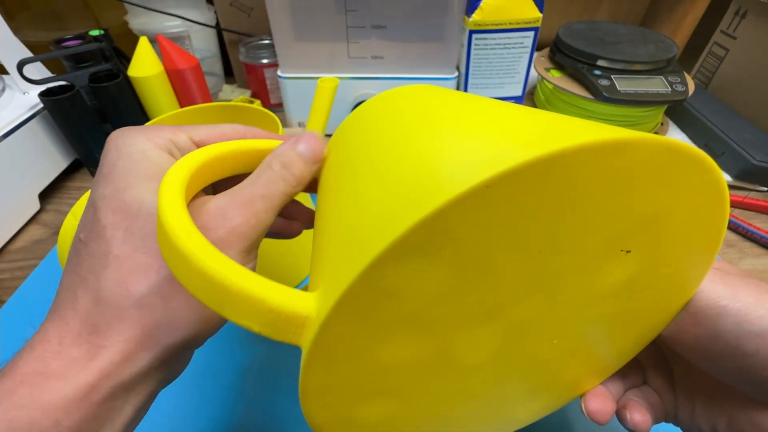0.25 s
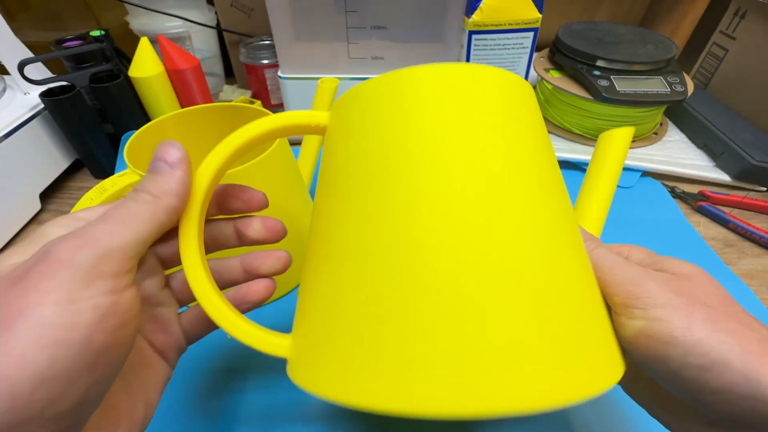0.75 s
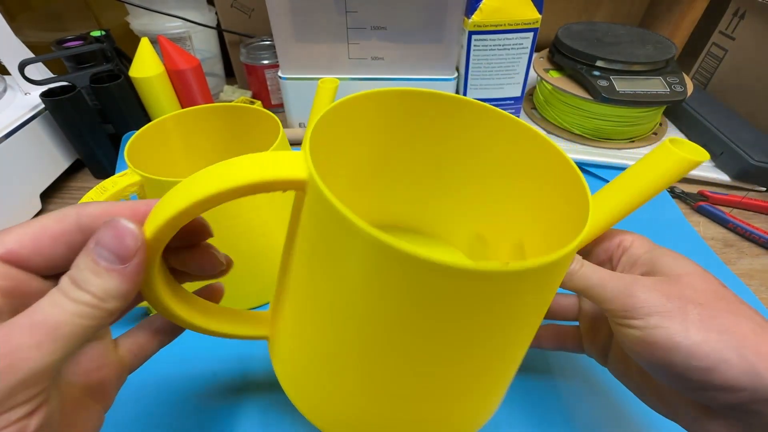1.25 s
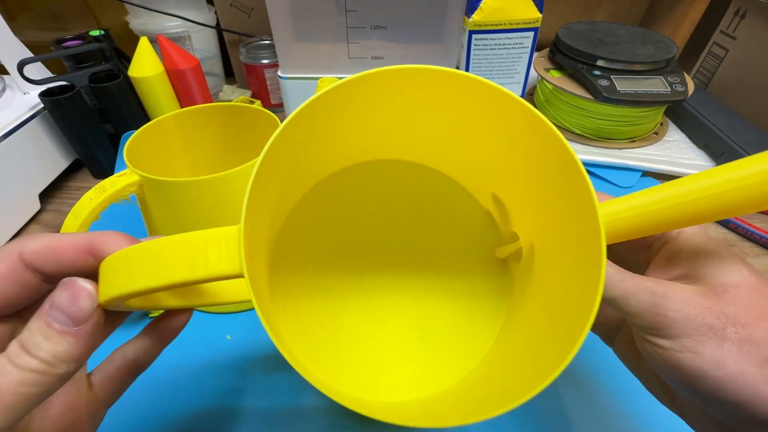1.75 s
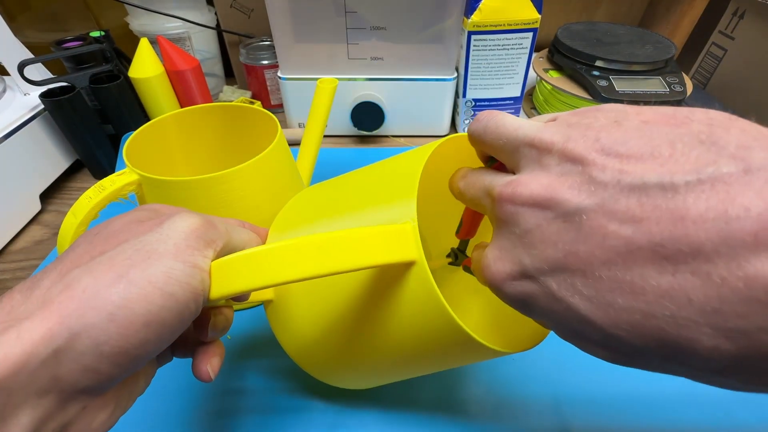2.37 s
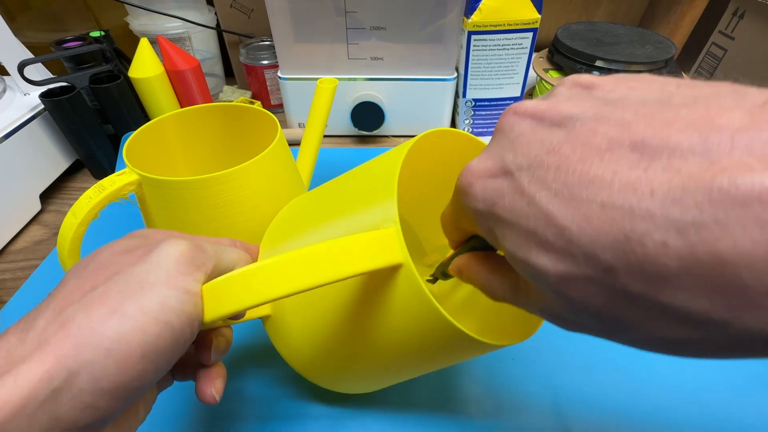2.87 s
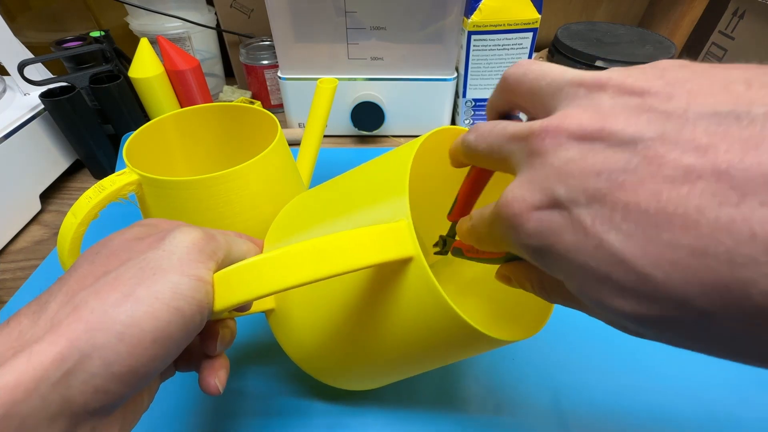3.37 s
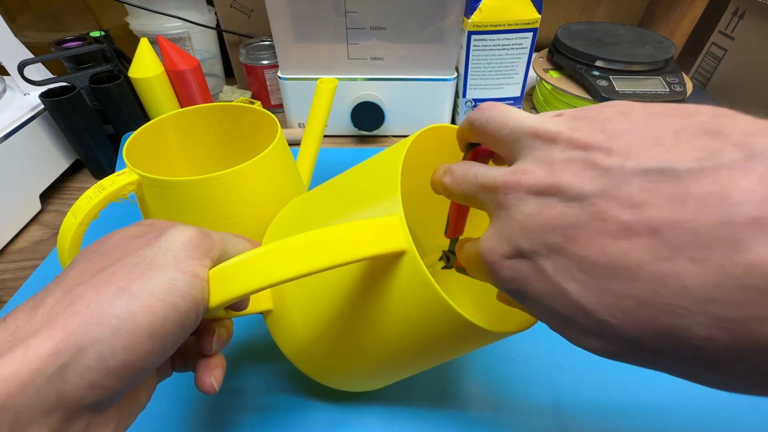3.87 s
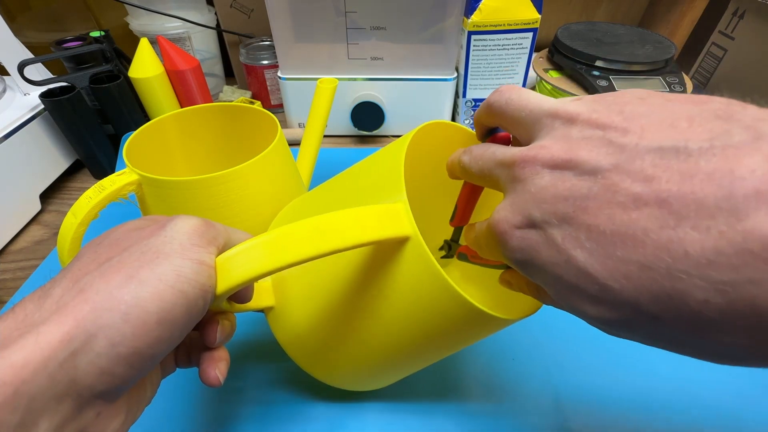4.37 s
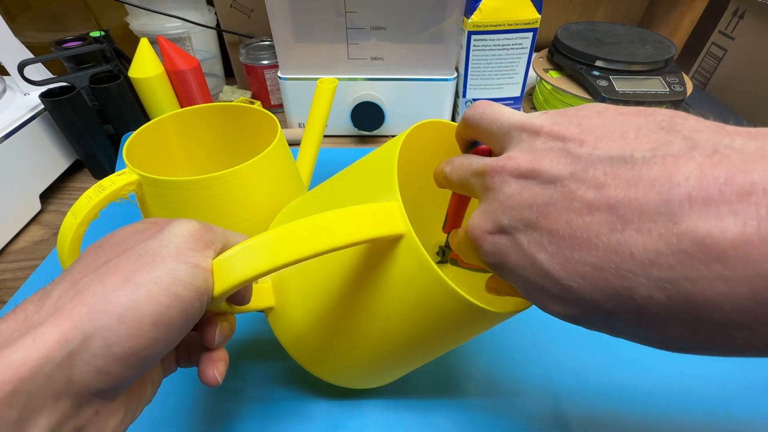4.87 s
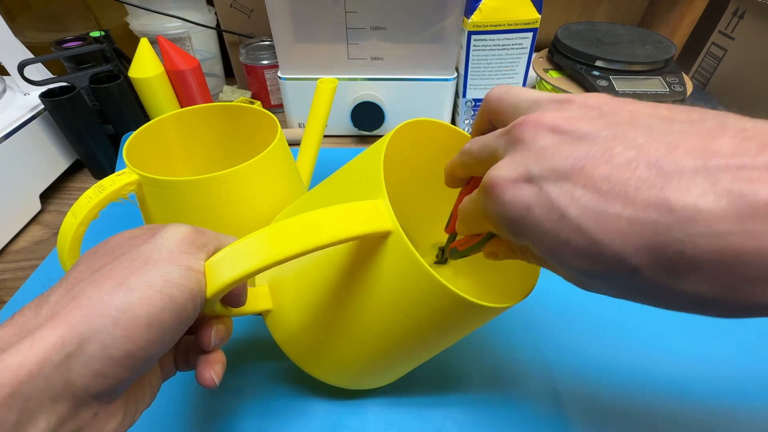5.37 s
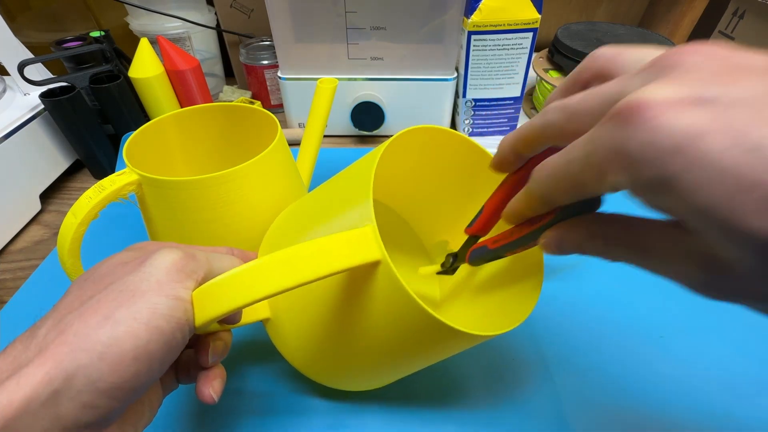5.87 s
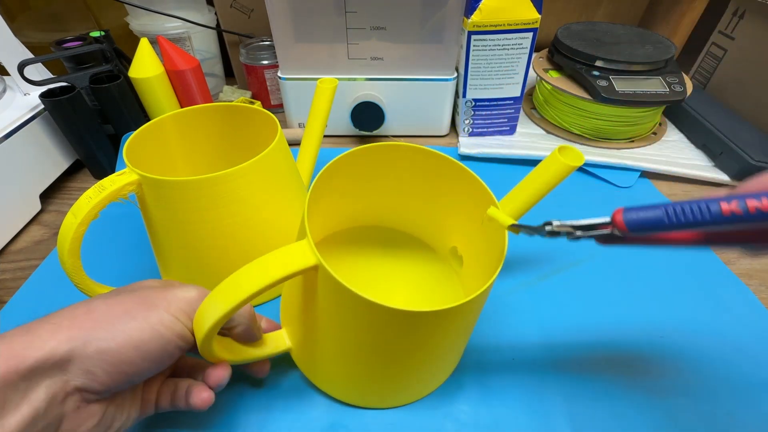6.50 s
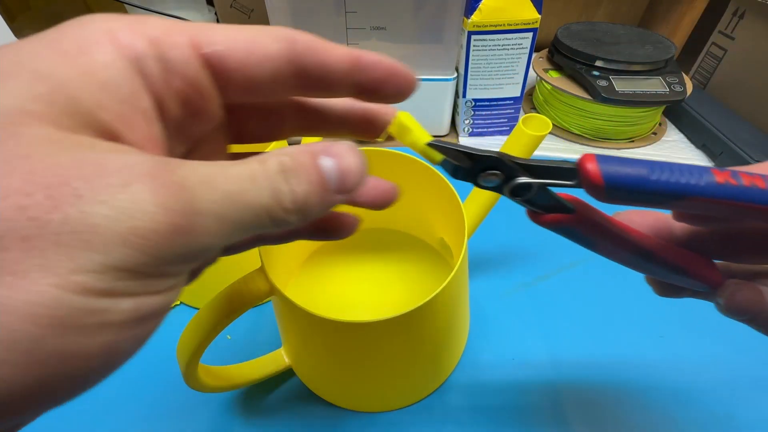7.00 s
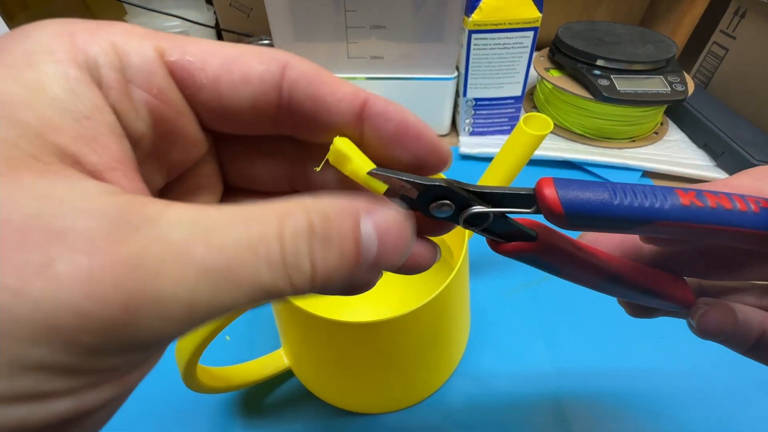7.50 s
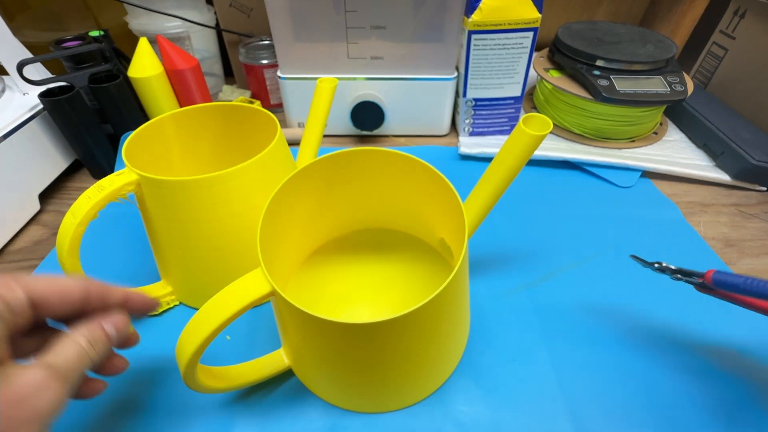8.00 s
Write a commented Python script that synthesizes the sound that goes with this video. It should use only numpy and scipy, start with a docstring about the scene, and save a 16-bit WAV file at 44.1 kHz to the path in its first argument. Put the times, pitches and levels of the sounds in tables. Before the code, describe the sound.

Close stereo pickup in a small room with a short tail and faint hiss. From 0 s hands rub and rumble on a hollow plastic can; a loud knock comes at once, with smaller knocks until 0.5 s. It quietens to light sliding, then soft finger slips hum through the wall from 1.55 to 2.03 s. At 2.43 s a support cracks sharply, followed by a dense burst of bright, ringing snaps, strongest near 2.7 s. A quiet gap follows. From 3.5 to 4.2 s steel scrapes over ridges in gritty strokes, with hollow clacks continuing to 4.7 s. Smaller snaps fall at 5.35-5.65 s. Between 6.3 and 6.85 s the can knocks down onto a soft mat, squeaks briefly and rocks to rest. Thin, dry cutter clicks come around 7.35 and 7.6 s, then a soft low bench thud at 8.13 s.

```python
"""Snapping supports out of a printed can

A hollow printed plastic can is turned in the hands at a workbench, creaking and knocking.
Side cutters reach inside and snap off its supports, each break ringing through the thin wall.
The can is set down on a rubber mat and rocks; the cutters click again and something thuds on the bench.
Blows are bursts of noise plus ringing tones (modes), shaped by a short force; rubbing, scraping,
rumble and hiss are coloured noise whose loudness changes over time."""
import sys
import numpy as np
from scipy import signal
from scipy.fft import rfft, irfft, next_fast_len
from scipy.io import wavfile
from scipy.ndimage import uniform_filter1d

SR = 44100
rng = np.random.default_rng(int(sys.argv[2]) if len(sys.argv) > 2 else 0)


def wrap_up_sound(samples):
    """Save the sound to the file named by the first command line argument, as 16-bit audio."""
    columns = np.atleast_2d(samples).T
    # keep every value between -1 and 1, then stretch to whole-number steps
    tamed = np.clip(columns, -1, 1)
    steps = np.round(tamed * 32767).astype(np.int16)
    wavfile.write(sys.argv[1], SR, steps)


N = 363384
TIME = np.arange(N) / SR   # seconds into the scene
RING_SIZE = 32768   # samples worked out for each contact
AGE = np.arange(RING_SIZE) / SR   # seconds since a contact began
RING_HZ = np.maximum(np.fft.rfftfreq(RING_SIZE, 1 / SR), 1)
SLIPS_END_S = 2.031   # moment at which the finger slips are cut off; later knocks ring other bodies

# borders of the five registers thump, knock, clack, crack and tick: (frequency [Hz])
REGISTER_EDGES_HZ = [90, 300, 900, 2500, 7000, 16000]
# modes of the steel cutters: (frequency [Hz], relative level [dB], time to fall 60 dB [s])
STEEL_MODES = [(4850, -4, 0.12), (7870, -5, 0.1), (9290, -0.5, 0.087), (9000, -8, 0.14), (14700, -0.5, .08)]


def from_db(db):
    """Turn decibels into a gain."""
    return 10 ** (np.asarray(db) / 20)


def at_hz(points, hz):
    """Read a spectrum between its points, on a log-frequency axis."""
    f, value = np.transpose(points)
    return np.interp(np.log(hz), np.log(f), value)


def gain_in_time(rows):
    """Turn (time, dB) points into a smooth gain curve for the whole scene."""
    s, db = np.transpose(rows)
    return from_db(np.interp(TIME, s, db))


def add(out, s, sound):
    """Mix a sound in at a time."""
    start = max(round(s * SR), 0)
    out[:, start:start + sound.shape[1]] += sound[:, :max(N - start, 0)]


def high_pass(x, cut_hz):
    """Take away what lies below a frequency."""
    return signal.sosfilt(signal.butter(4, cut_hz, "high", fs=SR, output="sos"), x)


def noise(spectrum, grain=1.0):
    """Coloured stereo noise of rms 1, alike in both ears in the bass and partly opposed above."""
    # likeness of left and right: (frequency [Hz], correlation [-1 to 1])
    likeness = [(50, 0.39), (140, 0.28), (300, 0.2), (600, -0.52), (1500, -0.17), (3500, -0.26),
                (8000, -0.023), (16000, -0.12)]
    size = next_fast_len(N)
    hz = np.maximum(np.fft.rfftfreq(size, 1 / SR), 1)
    mid, side = rfft(rng.standard_normal((2, N)) * grain, size)
    alike = np.clip(at_hz(likeness, hz), -1, 1)
    stereo = np.sqrt(1 + alike) * mid + np.sqrt(1 - alike) * side * [[1], [-1]]
    x = irfft(stereo * from_db(at_hz(spectrum, hz)))[:, :N]
    return x / x.std()


def catches(depth_db, size):
    """Friction grips and lets go: a gain that flutters over about size samples."""
    flutter = uniform_filter1d(uniform_filter1d(rng.standard_normal(N), size), size)
    return from_db(depth_db * np.tanh(flutter / flutter.std()))


def strokes(rows, rise, fall_db):
    """A sliding contact presses harder up to its height and then eases off, evenly in dB on both sides.

    rise is the rise time as a share of the length; fall_db is the drop over one length."""
    power = np.zeros(N)
    for s, db, length in rows:
        away = np.maximum((s - TIME) / rise, TIME - s) / length
        power += from_db(db - fall_db * np.minimum(away, 10)) ** 2
    return np.sqrt(power)


def swell(seconds):
    """A contact takes a moment to build up."""
    return 1 - np.exp(-AGE / seconds)


def ring(modes, scatter_db=4.0, half_turn_hz=2200, detune=0.013):
    """Struck modes; each contact strikes and loads the body differently, which shifts the high modes most."""
    out = np.zeros((2, RING_SIZE))
    for hz, db, t60 in modes:
        height = min(hz / half_turn_hz, 1)
        lag = np.pi * height * rng.uniform(0.033, 1.1)   # high modes reach the two ears out of step
        pitch = hz * (1 + detune * height * rng.uniform(-1, 1))
        phase = (2 * np.pi * pitch * AGE - [[0], [lag]]).astype(np.float32)
        strength = from_db(db + scatter_db * rng.uniform(-0.67, 1)) * rng.choice([-1, 1])
        out += strength * np.exp(-np.log(1000) * AGE / t60) * np.sin(phase)
    return out


def octave_noises():
    """Noise in the colour of the contacts, split into octave-wide bands: (Hz, stereo noise) each."""
    # colour of contacts at the microphone: (frequency [Hz], relative level [dB])
    colour = [(40, -9.5), (130, 2.5), (350, -4), (550, 0.5), (980, -2.5), (1500, 3.5), (4200, 0),
              (6500, -2), (7450, -3), (7900, -5), (9400, 4), (11800, -5), (15000, 0)]
    spectrum = rfft(noise(colour), 8 * RING_SIZE)
    hz = np.linspace(1, SR / 2, spectrum.shape[1])
    centres = np.geomspace(100, 14000, 8)
    bands = []
    for centre, share in zip(centres, np.eye(len(centres))):
        weight = at_hz(list(zip(centres, share)), hz)   # neighbouring bands cross-fade
        bands.append((centre, irfft(spectrum * weight)))
    return bands


def clatter(octaves, length, room_db, room_t60, edge_db, edge_s=0.0012, treble_loss_hz=26000):
    """Endless responses of the dense modes: a sharp edge, a fast decay, then the room's tail.

    Each is cut at random from the noise bands; the room's tail is shorter in the treble."""
    # decay of the wall's countless close modes, before scaling by length:
    # (frequency [Hz], time to fall 60 dB [s])
    wall_decay = [(100, .09), (500, 0.097), (1500, 0.017), (4000, 0.095), (8000, 0.048), (15000, 0.066)]
    edge = from_db(edge_db) * np.exp(-AGE / edge_s)
    decays = []
    for hz, band in octaves:
        wall = from_db(-60 * AGE / (length * at_hz(wall_decay, hz)))
        room = from_db(room_db - 60 * AGE * (1 + hz / treble_loss_hz) / room_t60) * swell(0.0054)
        decays.append(np.hypot(wall + edge, room))
    while True:
        start = rng.integers(RING_SIZE, 7 * RING_SIZE)
        yield sum(decay * band[:, start:start + RING_SIZE] for decay, (hz, band) in zip(decays, octaves))


def splinters(count=4, spread_s=.004, share=0.63):
    """No contact is one clean blow: smaller slips follow within milliseconds and comb its spectrum."""
    delays = rng.exponential(spread_s, count)
    sizes = share * rng.uniform(-1, 1, count)
    force = np.zeros(RING_SIZE)
    force[0] = 1
    force[1 + (delays * SR).astype(int)] += sizes
    return rfft(force)


def register_levels(shape_db, level_db, brightness, thump_db, pivot_hz=1500):
    """A harder contact tilts the shared spectrum towards the treble; the push behind it sets the thump."""
    edges = np.array(REGISTER_EDGES_HZ[1:])
    octaves_up = np.log2(np.sqrt(edges[1:] * edges[:-1]) / pivot_hz)
    return np.r_[thump_db, level_db + np.array(shape_db) + brightness * octaves_up]


def strike(response, levels_db, left_db):
    """The contact force is a short causal pulse that gives each register its level.

    Levels are rms, as if all the energy fell within 25 ms; left_db is left minus right as (Hz, dB)."""
    balance = from_db(np.outer([.5, -.5], at_hz(left_db, RING_HZ)))
    spectrum = rfft(response) * splinters() * balance
    power = np.mean(abs(spectrum) ** 2, axis=0) * 2 / (RING_SIZE * .025 * SR)
    edges = np.array(REGISTER_EDGES_HZ)
    centres = np.sqrt(edges[1:] * edges[:-1])
    bins = np.searchsorted(RING_HZ, edges)
    force_db = np.zeros(len(centres))
    force = np.ones(len(RING_HZ))
    for _ in range(3):   # neighbouring registers overlap, so settle them in turn
        force_db += levels_db - 10 * np.log10(np.add.reduceat(power * force ** 2, bins)[:-1])
        force = from_db(at_hz(list(zip(centres, force_db)), RING_HZ))
    # folding the cepstrum makes the pulse start at once (minimum phase)
    cepstrum = irfft(np.log(force))
    cepstrum[1:RING_SIZE // 2] *= 2
    cepstrum[RING_SIZE // 2 + 1:] = 0
    dying = np.clip(2 - 2.5 * AGE / AGE[-1], 0, 1)   # fade to silence before the buffer ends
    return dying * irfft(spectrum * np.exp(rfft(cepstrum)))


def hiss(lift_db=1.0):
    """Microphone hiss: steady coloured noise whose level drifts slowly."""
    # colour: (frequency [Hz], relative level per Hz [dB])
    hiss_colour = [(300, -4), (1000, 0.5), (2000, 1), (5200, -10), (5900, 1), (7100, 4.5), (7500, -8.5),
                   (7900, 0.5), (8500, 1.5), (9300, -18), (16000, -23)]
    # loudness before the lift: (time [s], level [dB])
    hiss_level = [(0, -69), (1.9, -70), (2.2, -75.5), (8.24, -73.5)]
    return from_db(lift_db) * gain_in_time(hiss_level) * noise(hiss_colour)


def hands(rumble_db=3, rub_db=4.0, grip_rub_db=-15):
    """Skin rumbles on the hollow body and rubs over its ridges in small catches.

    Holding mostly rumbles, sliding does both."""
    # hands holding the can, before the gains above: (time [s], level [dB])
    grip_level = [(0.0, -41), (0.25, -47.5), (0.6, -50), (1.49, -56), (1.84, -50.5), (2.04, -68.5),
                  (2.27, -66), (2.61, -55), (3.23, -66.5), (4.38, -61.5), (5.14, -61), (5.62, -59),
                  (5.78, -60.5), (6.24, -61), (6.45, -57.5), (7.21, -68.5), (8.24, -64)]
    # palms sliding on the can, before the rub gain: (time of the height [s], level [dB], length [s])
    slide_strokes = [(.02, -52, 0.21), (.16, -63, 0.28), (.39, -51.5, 0.18), (.52, -48.5, 0.045),
                     (1.03, -59, 0.16), (1.25, -66, 0.13), (1.8, -69, 0.21), (2.612, -35, 0.05),
                     (2.81, -52.5, 0.17), (3.15, -64, 0.23), (3.85, -57, 0.12), (4.35, -61, 0.13),
                     (4.75, -65, 0.085), (5.47, -64.5, .09), (5.53, -46, 0.029), (5.76, -64.5, 0.15),
                     (6.29, -59.5, .04), (6.46, -48, 0.046), (6.63, -63, 0.26), (6.84, -58, 0.068)]
    # colours of rumble and rub: (frequency [Hz], relative level per Hz [dB])
    rumble_colour = [(12, -47), (20, -23.5), (34, -10), (65, 1.5), (80, 0.5), (103, -10.5), (144, -4.5),
                     (198, -15.5), (252, -14.5), (310, -16.5), (507, -18.5), (634, -32), (900, -30.5),
                     (1170, -62.5), (1980, -120)]
    rub_colour = [(240, -36), (400, -13), (460, -1.5), (879, -18), (1110, -12), (1490, -13.5), (1600, -9),
                  (1820, -14.5), (3870, -18), (16000, -41)]
    grip = gain_in_time(grip_level)
    slide = strokes(slide_strokes, rise=0.99, fall_db=13)
    rumble = np.hypot(from_db(rumble_db) * grip, slide)
    rub = np.hypot(from_db(grip_rub_db) * grip, from_db(rub_db) * slide)
    rumbling = rumble * noise(rumble_colour) * from_db([[1.4], [-1.4]])   # a little to the left
    rubbing = rub * noise(rub_colour, catches(4.0, size=400))
    return rumbling + rubbing


def scrape():
    """Steel skips over the layer ridges: fluttering noise in short strokes."""
    # strokes of the jaws as the support is twisted: (time of the height [s], level [dB], length [s])
    jaw_strokes = [(3.5, -58, 0.16), (3.625, -54.5, 0.078), (3.702, -40, 0.016), (3.752, -47, 0.037),
                   (3.885, -32.5, 0.071), (3.97, -44.5, 0.19), (4.175, -41.5, 0.04)]
    # colour: (frequency [Hz], relative level per Hz [dB])
    scrape_colour = [(240, -50), (400, -26), (579, -7), (839, -14), (1040, -13), (1200, -3), (2290, -1),
                     (2470, 0.5), (4050, 0.5), (7280, -9), (15000, -15.5), (16000, -17)]
    grain = catches(5.0, size=90)
    return strokes(jaw_strokes, rise=0.64, fall_db=18.5) * noise(scrape_colour, grain)


def slips(octaves, modes_db=-12, rise_s=.003, end_fade_s=.004):
    """Soft fingers catch on the wall and set it humming; the finger slips are cut off abruptly."""
    # fingers catching on the lifted can:
    # (time [s], level [dB], brightness [dB per octave], thump level [dB])
    finger_slips = [(0.018, -37.5, 0, -36), (.246, -45, 0.5, -53), (1.562, -53.5, -2.5, -39),
                    (1.672, -54.5, -2, -42), (1.733, -42.5, -1.5, -41), (1.755, -50, -2, -39.5),
                    (1.802, -42.5, -0.5, -44), (1.854, -52, 1, -43), (1.997, -40.5, 0, -42),
                    (2.015, -34, 0.5, -47.5), (2.024, -36.5, -3, -38)]
    # what all slips share, for knock, clack, crack and tick: (level against the slip's own [dB])
    slip_shape = [0, -13, -9.5, -26.5]
    # can damped by sliding fingers: (frequency [Hz], relative level [dB], time to fall 60 dB [s])
    fingered_modes = [(142, 5, .22), (491.8, 4, 0.16), (540, 6, .07), (1330, -9, 0.08), (2330, -7, .08),
                      (3250, -5.5, 0.033), (4100, -11, 0.048)]
    left_db = [(140, 9.0), (280, 3.5), (550, 10.0), (1300, 0.5), (4000, 4.5), (10000, -0.5)]
    out = np.zeros((2, N))
    dense = clatter(octaves, length=0.82, room_db=-21.5, room_t60=0.45, edge_db=-3.0, treble_loss_hz=14000)
    for s, db, brightness, thump_db in finger_slips:
        response = (next(dense) + from_db(modes_db) * ring(fingered_modes)) * swell(rise_s)
        levels_db = register_levels(slip_shape, db, brightness, thump_db)
        add(out, s, strike(response, levels_db, left_db))
    return out * np.clip((SLIPS_END_S - TIME) / end_fade_s + 1, 0, 1)


def bumps(octaves, modes_db=-15, rise_s=0.0011):
    """Nothing breaks: blunt steel meets the wall with a hollow clack."""
    # cutters bumping the inner wall as they lever:
    # (time [s], level [dB], brightness [dB per octave], thump level [dB])
    wall_bumps = [(2.235, -65, -1, -69), (3.774, -43, 0.5, -50), (4.093, -37, 1, -47.5),
                  (4.184, -43, -1, -50), (4.328, -51.5, -0.5, -49), (4.345, -49.5, 0, -54.5),
                  (4.459, -43, 0.5, -54), (4.599, -41, 0, -51.5), (4.678, -45.5, 0, -44),
                  (4.955, -66, 1, -59), (5.108, -68, 3.5, -54)]
    # what all bumps share, for knock, clack, crack and tick: (level against the bump's own [dB])
    bump_shape = [-1, 0.5, -8, -21.5]
    # wall bumped from inside: (frequency [Hz], relative level [dB], time to fall 60 dB [s])
    bumped_modes = [(134.6, -7.5, 0.26), (194, -4.5, 0.17), (469, -1, 0.15), (1230, -6.5, 0.068),
                    (1353, 3.5, 0.11), (1520, 3, 0.08), (1620, 2, 0.087), (2460, -11, 0.11)]
    left_db = [(140, -0.5), (550, 1.5), (1300, 6.0), (4000, 2.0), (10000, 1.0)]
    out = np.zeros((2, N))
    dense = clatter(octaves, length=1.15, room_db=-20.5, room_t60=0.54, edge_db=1.0)
    for s, db, brightness, thump_db in wall_bumps:
        response = (next(dense) + from_db(modes_db) * ring(bumped_modes)) * swell(rise_s)
        levels_db = register_levels(bump_shape, db, brightness, thump_db)
        add(out, s, strike(response, levels_db, left_db))
    return out


def rocking():
    """The rim of the base rolls onto the soft mat a few times, just after a loose support piece pings."""
    # the can rocking to rest: (time [s], base level [dB], wall level [dB])
    rocks = [(6.529, -43, -61), (6.613, -39.5, -46), (6.624, -35.5, -43.5), (6.672, -55.5, -43.5),
             (6.705, -51, -43.5), (6.722, -62.5, -40.5), (6.765, -61.5, -48.5), (6.845, -50.5, -53)]
    # base and wall once the can stands free:
    # (frequency [Hz], relative level [dB], time to fall 60 dB [s])
    base_modes = [(227.3, 3, 0.21), (247, -2, 0.41)]
    wall_modes = [(501.7, 4, 0.15), (540, -32, .12), (580, -1, 0.17)]
    # a loose support piece pings: # (time [s], level [dB], frequency [Hz], time to fall 60 dB [s])
    squeaks = [(6.438, -20.5, 1590, 0.17)]
    out = np.zeros((2, N))
    cushion = swell(.004) ** 2   # the soft mat rounds off each start
    for s, base_db, wall_db in rocks:
        base = from_db(base_db) * ring(base_modes) * from_db([[1.2], [-1.2]])
        wall = from_db(wall_db) * ring(wall_modes) * from_db([[4], [-4]])
        add(out, s, (base + wall) * cushion)
    for s, db, hz, t60 in squeaks:
        add(out, s, ring([(hz, db, t60)]) * cushion)
    return out


def jaws(octaves, steel_db=-24, low_hz=2600):
    """Away from the can the cutters give dry, thin clicks."""
    # the steel jaws on their own, rms of the first 25 ms before panning: (time [s], level [dB])
    jaw_clicks = [(7.320, -64), (7.354, -60), (7.38, -46.5), (7.395, -52.5), (7.635, -61.5), (8.007, -66.5),
                  (8.21, -78)]
    out = np.zeros((2, N))
    dense = clatter(octaves, length=0.5, room_db=-15, room_t60=0.17, edge_db=-4.0)
    for s, db in jaw_clicks:
        click = high_pass(next(dense) + from_db(steel_db) * ring(STEEL_MODES), low_hz)
        add(out, s, from_db(db) * click / click[:, AGE < .025].std())
    return out * from_db([[1.5], [-1.5]])   # a little to the left


def knocks(octaves, lifted_db=-14, landing_db=-14, bench_db=-10, rise_s=0.00065, thud_s=8.0):
    """Knocks ring whatever they touch: the lifted can, the can landing on the mat, the bench."""
    # hard knocks: (time [s], level [dB], brightness [dB per octave], thump level [dB])
    hard_knocks = [(.055, -23, 1, -51), (.059, -20, -6, -22.5), (.2, -45.5, 0.5, -61),
                   (.301, -39, -4.5, -30), (.4, -44, 2, -44.5), (.407, -36, -0.5, -33),
                   (.45, -39.5, -1.5, -59), (.486, -44.5, -0.5, -49), (6.3, -47.5, -6.5, -53.5),
                   (6.357, -32, -4, -45), (6.385, -41.5, -4, -30.5), (6.409, -47.5, 1.5, -43),
                   (6.435, -39, -5, -50), (6.449, -37, -5, -44), (6.523, -54, -8, -42),
                   (8.111, -54.5, -0.5, -69), (8.133, -48.5, -12, -27.5), (8.146, -54, -8, -30.5)]
    # what all knocks share, for knock, clack, crack and tick: (level against the blow's own [dB])
    knock_shape = [-1, 0, 2.5, -8.5]
    # can lifted by its handle, can landing on the mat, bench top:
    # (frequency [Hz], relative level [dB], time to fall 60 dB [s])
    lifted_modes = [(140.5, 4, 0.27), (280.6, -19.5, 1), (425, 0.5, 0.045), (496, 1.5, .07), (549, 4, .06),
                    (593, 2.5, 0.12), (715, -11.5, .22), (817, -10, 0.26), (1144, -9, 0.08),
                    (1200, -7.5, 0.13), (1376, -11, 0.17), (1500, -4, .15), (1710, -4.5, 0.15),
                    (1742, -3, 0.07), (2174, -4.5, 0.08), (2387, -9, .17), (2580, -10.5, .18),
                    (3350, 0.5, 0.15), (3530, -12.5, 0.1), (4195, -8.5, 0.13), (4670, -7.5, .17)]
    landing_modes = [(172, 0.5, 0.083), (232, -6, 0.088), (304, -12.5, 0.25), (465.4, -6.5, 0.14),
                     (592, -16, 0.32), (800, -2.5, 0.08), (950, 0.5, 0.035), (1050, -8, 0.19),
                     (1234, -12.5, 0.33), (1665, -10.5, 0.33)]
    bench_modes = [(114.4, -4, 0.29), (215, -9.5, 0.19), (320, -0.5, 0.12), (880, -2.5, 0.047)]
    lifted_left_db = [(140, 6.0), (300, -3.0), (550, 7.0), (1300, 0.5), (4000, 5.5), (10000, 1.0)]
    lower_left_db = [(140, 1.0), (280, 4.0), (600, 7), (1300, 3.0), (10000, 4.0)]
    out = np.zeros((2, N))
    dense = clatter(octaves, length=1.0, room_db=-20.5, room_t60=0.5, edge_db=-3.5, treble_loss_hz=14000)
    for s, db, brightness, thump_db in hard_knocks:
        left_db = lifted_left_db if s < SLIPS_END_S else lower_left_db
        if s < SLIPS_END_S:
            modes = from_db(lifted_db) * ring(lifted_modes)
        elif s < thud_s:
            modes = from_db(landing_db) * ring(landing_modes)
        else:   # from here on, knocks land on the bench and not on the can
            modes = from_db(bench_db) * ring(bench_modes)
        response = (next(dense) + modes) * swell(rise_s)
        levels_db = register_levels(knock_shape, db, brightness, thump_db)
        add(out, s, strike(response, levels_db, left_db))
    return out


def snaps(octaves, modes_db=-17, steel_db=-21, rise_s=0.00095):
    """A support gives way: wall and cutters ring together."""
    # supports breaking inside the can:
    # (time [s], level [dB], brightness [dB per octave], thump level [dB])
    support_snaps = [(2.306, -60.5, -2, -56), (2.434, -41, 3, -55), (2.441, -28, -0.5, -61.5),
                     (2.458, -26.5, -0.5, -42), (2.469, -49, 0, -50.5), (2.562, -41.5, 4, -49),
                     (2.586, -43.5, 8, -61), (2.598, -33.5, 0, -39), (2.623, -30.5, 2, -39),
                     (2.645, -32.5, 1.5, -44), (2.653, -30.5, 2, -34.5), (2.7, -21.5, -2.5, -48),
                     (2.715, -40.5, -3.5, -28.5), (2.779, -43.5, 1.5, -68), (3.48, -60, -1.5, -58),
                     (3.667, -52, 2, -64), (3.724, -55, 3.5, -78), (3.795, -51, 5, -56),
                     (3.853, -38.5, 0.5, -90), (4.086, -37.5, -1.5, -42.5), (4.306, -67.5, 5, -73),
                     (4.576, -53.5, 2, -74), (5.357, -57.5, -1.5, -56.5), (5.376, -48, 2, -51.5),
                     (5.482, -41.5, 2.5, -45), (5.502, -34.5, 0, -39.5), (5.625, -59, 9, -61),
                     (5.639, -39, 0.5, -41)]
    # what all snaps share, for knock, clack, crack and tick: (level against the snap's own [dB])
    snap_shape = [-2, 1, 2.5, -4.5]
    # can held in the hands with the cutters inside: # (frequency [Hz], relative level [dB], time to fall 60 dB
    # [s])
    pressed_modes = [(141, -4.5, 0.22), (478, -5.5, 0.13), (544.6, -11, .12), (595.4, -8.5, 0.11),
                     (725, -7.5, 0.05), (872, -9, 0.058), (1234, -2, 0.052), (1321, -5.5, 0.11),
                     (1540, -3, 0.11), (1626.5, 2, 0.14), (1742, -10, 0.074), (2250, -8.5, 0.14),
                     (2380, 2.5, 0.11), (2516, -0.5, 0.12), (3220, -5.5, 0.059), (3930, -8.5, 0.1),
                     (4200, -2.5, .11)]
    left_db = [(140, 0.0), (380, -1.5), (700, 5.5), (1300, 0.5), (4000, 5.0), (10000, -0.7)]
    out = np.zeros((2, N))
    dense = clatter(octaves, length=0.73, room_db=-17, room_t60=0.35, edge_db=0.5)
    for s, db, brightness, thump_db in support_snaps:
        wall = from_db(modes_db) * ring(pressed_modes)
        steel = from_db(steel_db) * ring(STEEL_MODES)
        response = (next(dense) + wall + steel) * swell(rise_s)
        levels_db = register_levels(snap_shape, db, brightness, thump_db)
        add(out, s, strike(response, levels_db, left_db))
    return out


def scene(bass_cut_hz=52):
    """All contacts over handling noise and hiss; the blows are high-passed, which leaves out their deep bass."""
    octaves = octave_noises()
    background = hiss() + hands() + scrape()
    blows = slips(octaves) + bumps(octaves) + knocks(octaves) + snaps(octaves)
    return background + rocking() + jaws(octaves) + high_pass(blows, bass_cut_hz)


def record(dry, cutoff_hz=16100):
    """Anything beyond full scale overloads and is clipped; then the top of the treble is cut."""
    low_pass = signal.ellip(10, .2, 70, cutoff_hz, fs=SR, output="sos")
    return signal.sosfilt(low_pass, np.clip(dry, -1, 1))


dry = scene()
out = record(dry)
wrap_up_sound(out)
```